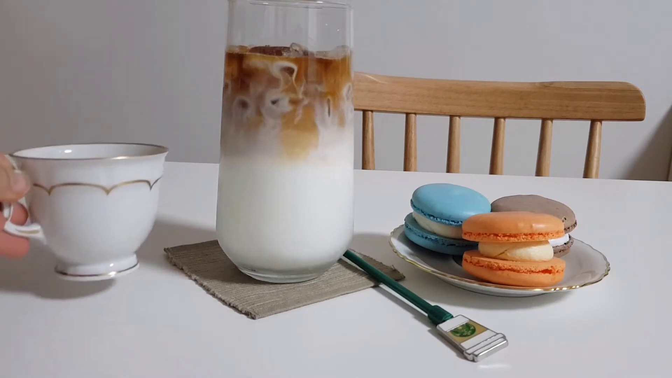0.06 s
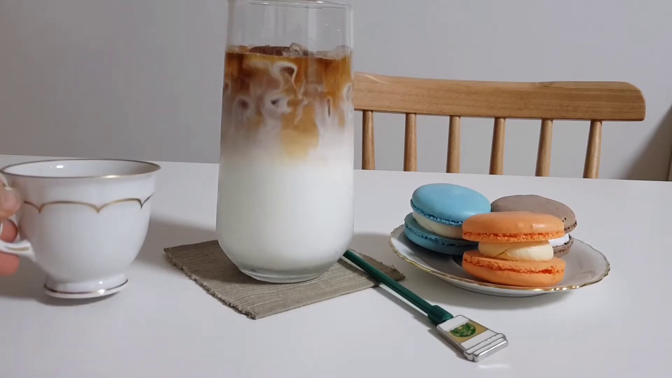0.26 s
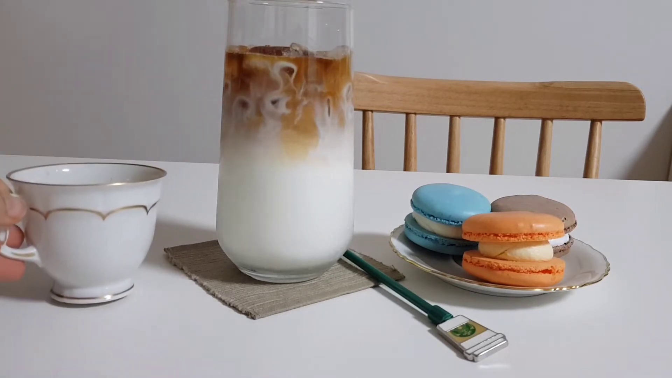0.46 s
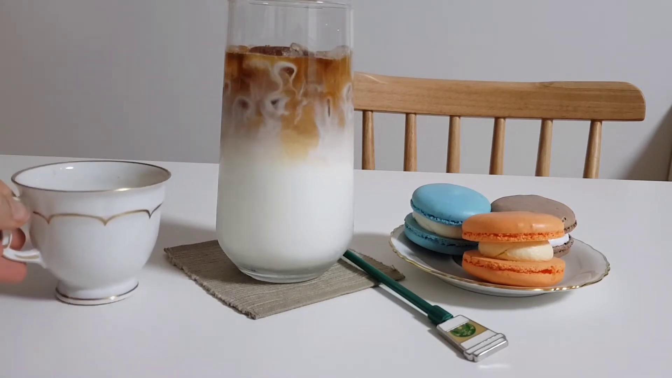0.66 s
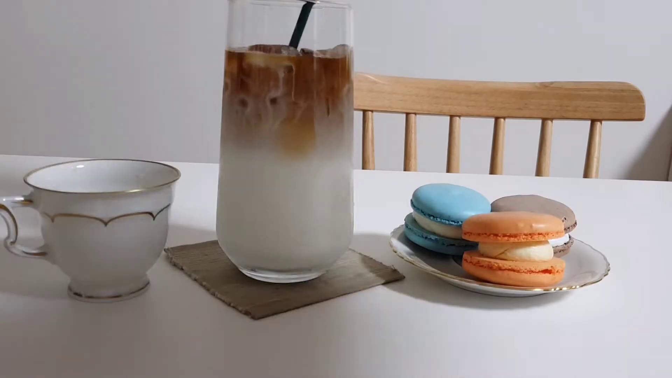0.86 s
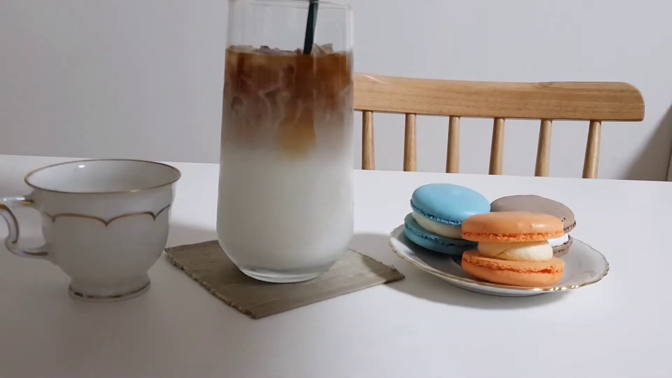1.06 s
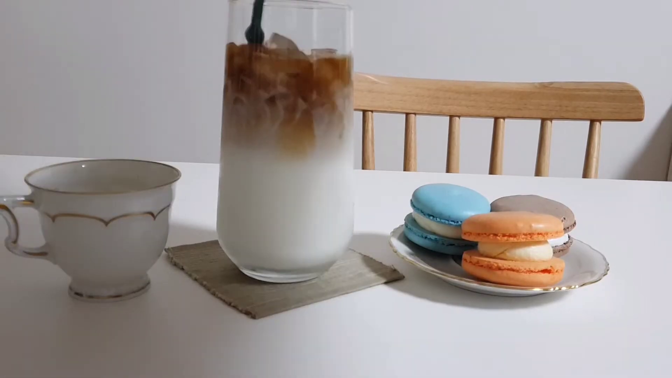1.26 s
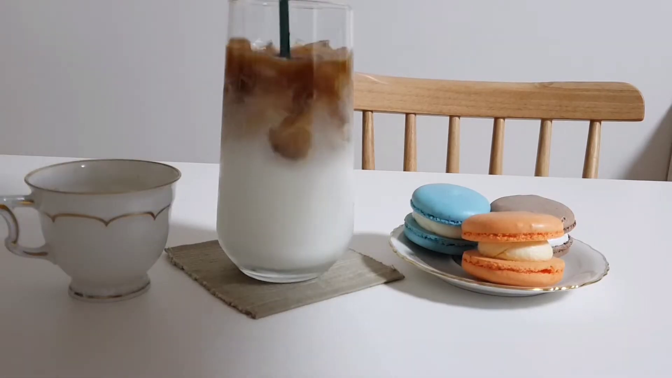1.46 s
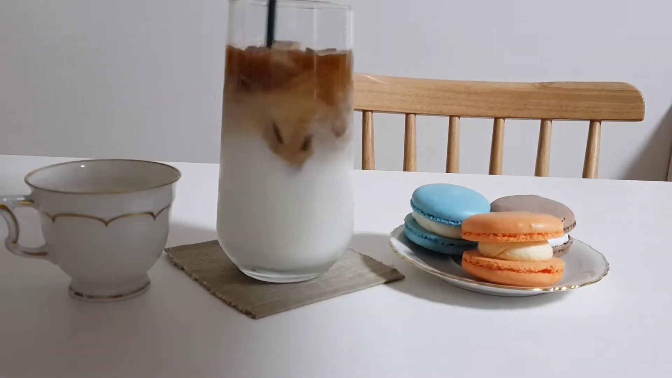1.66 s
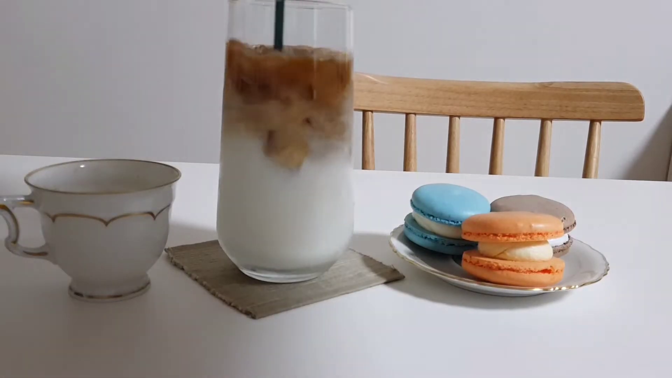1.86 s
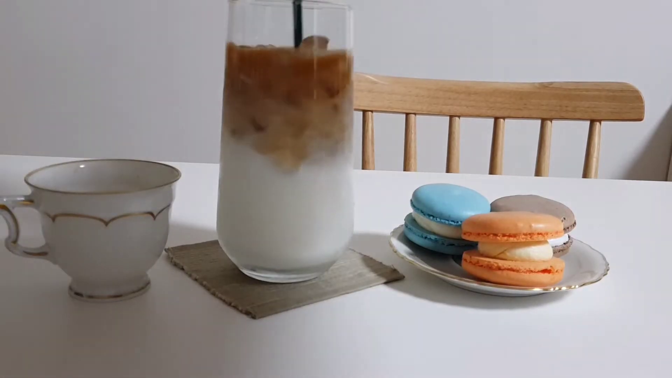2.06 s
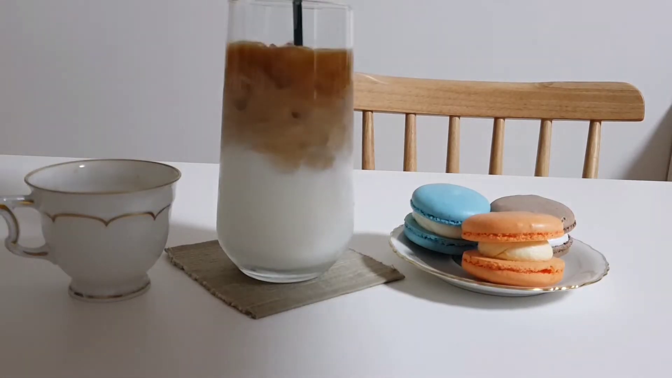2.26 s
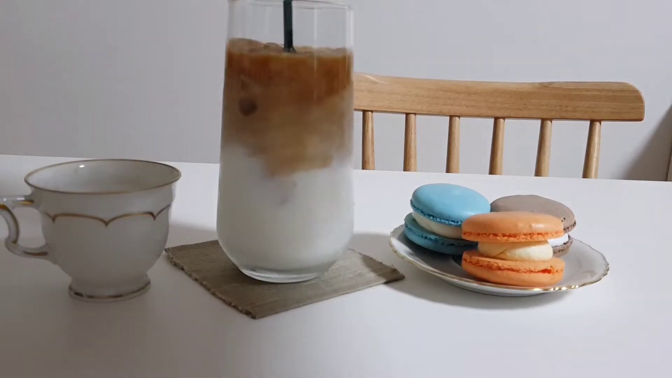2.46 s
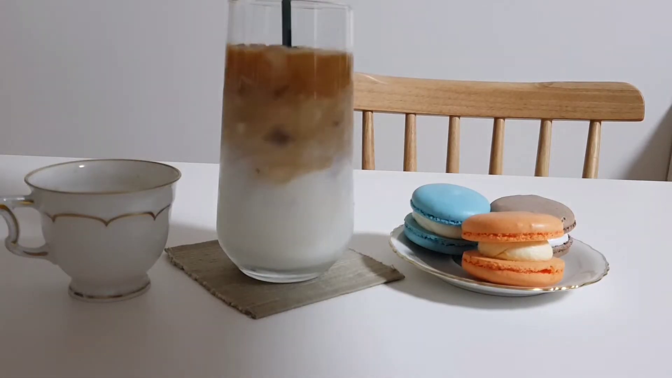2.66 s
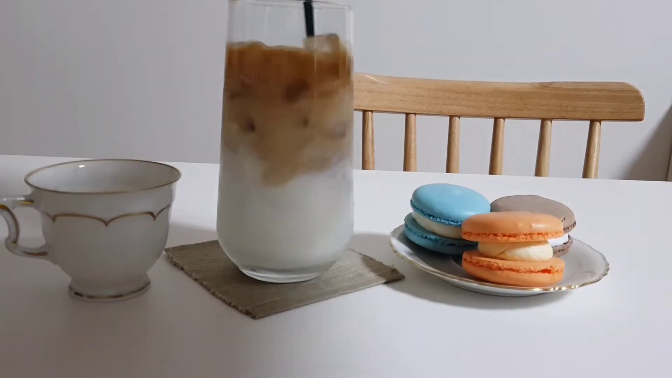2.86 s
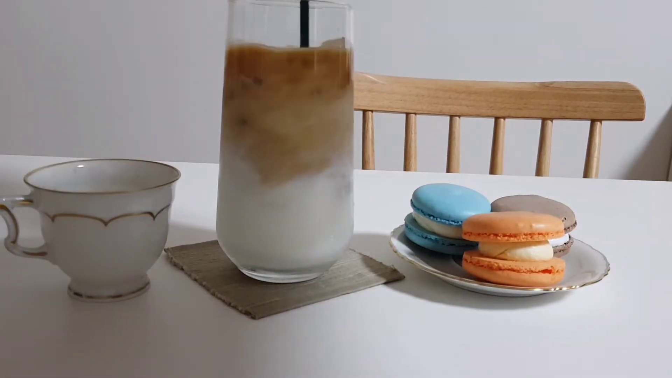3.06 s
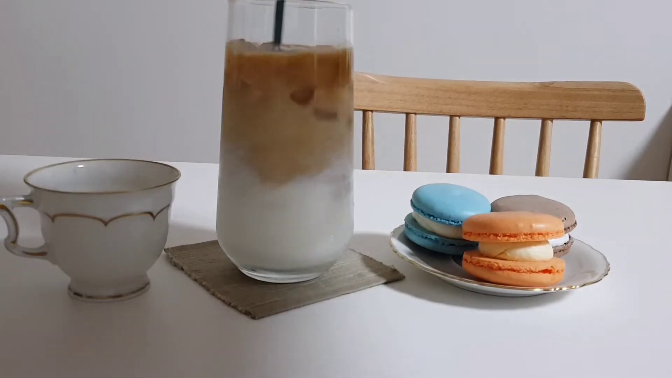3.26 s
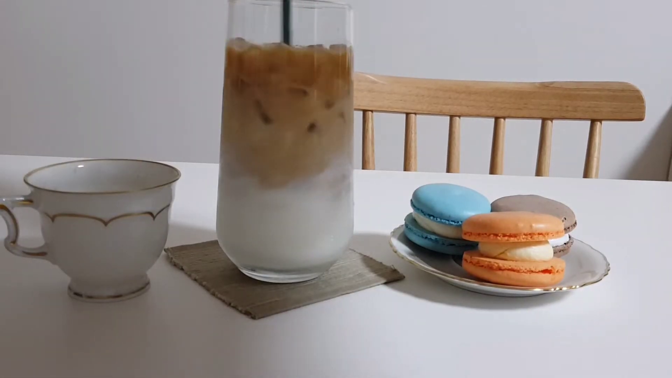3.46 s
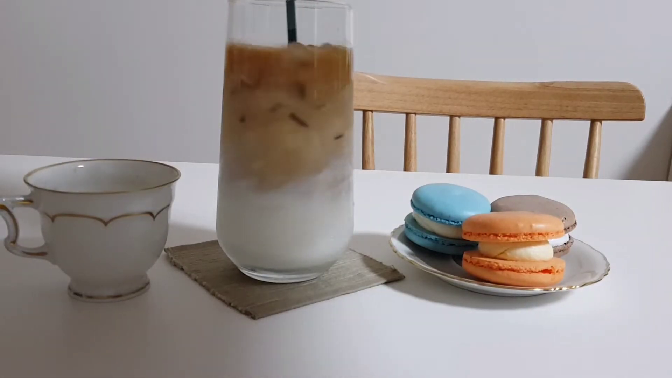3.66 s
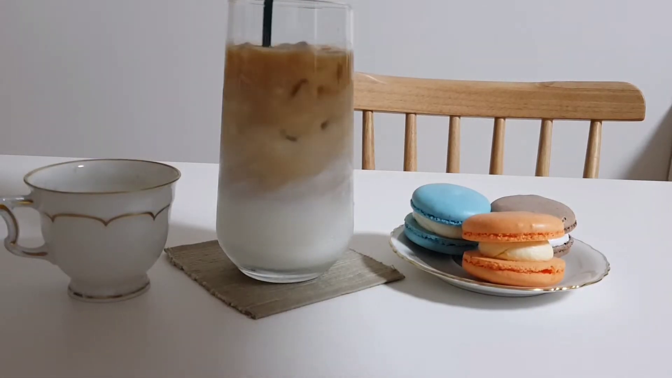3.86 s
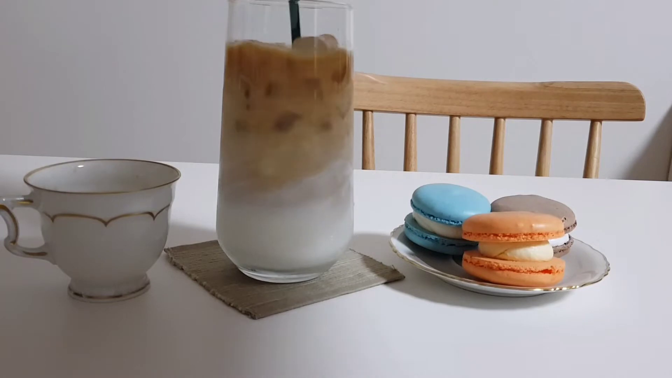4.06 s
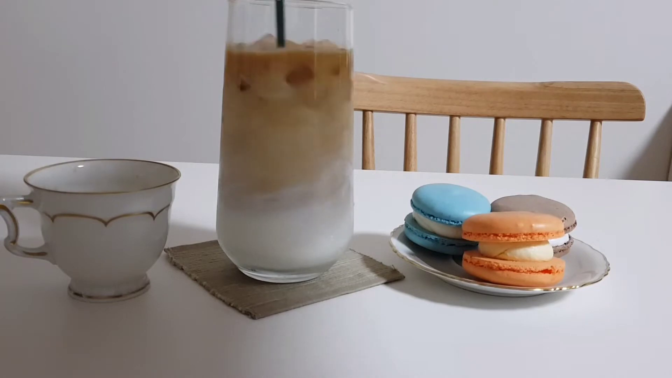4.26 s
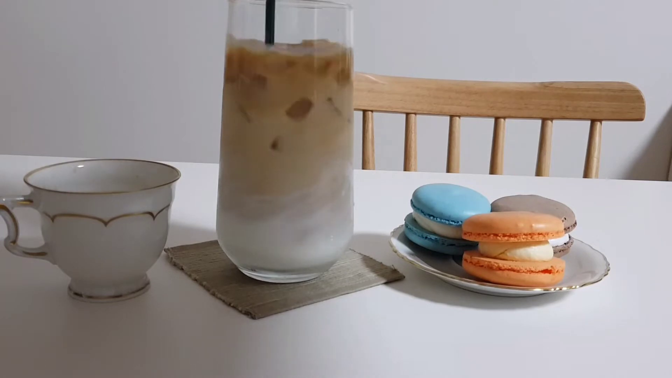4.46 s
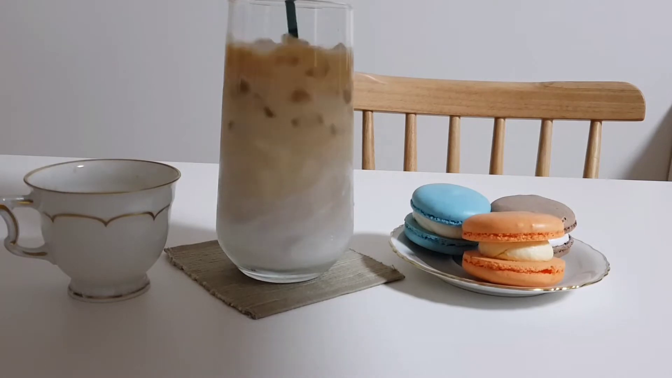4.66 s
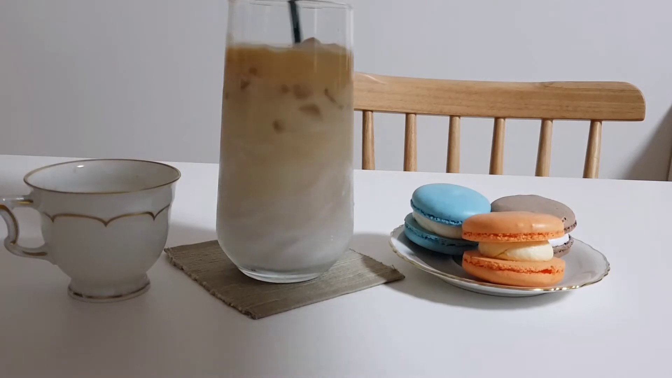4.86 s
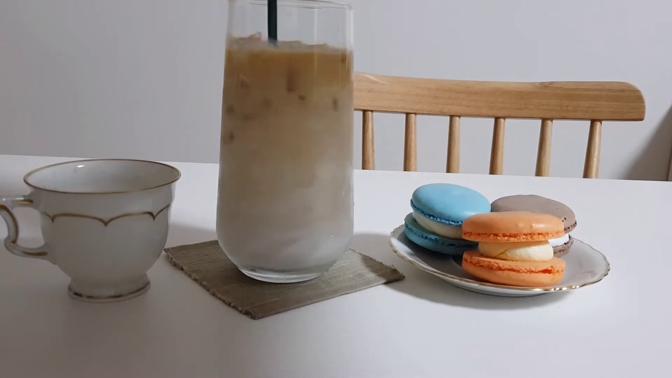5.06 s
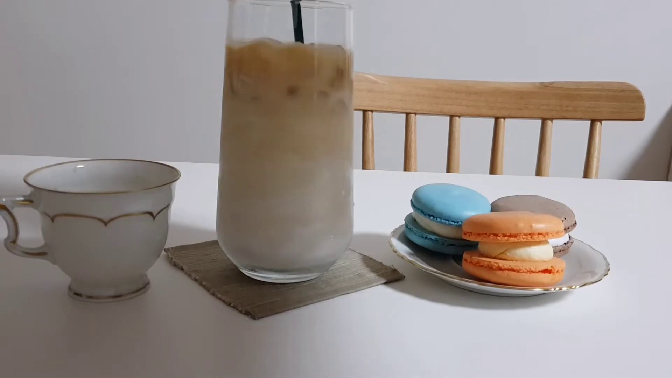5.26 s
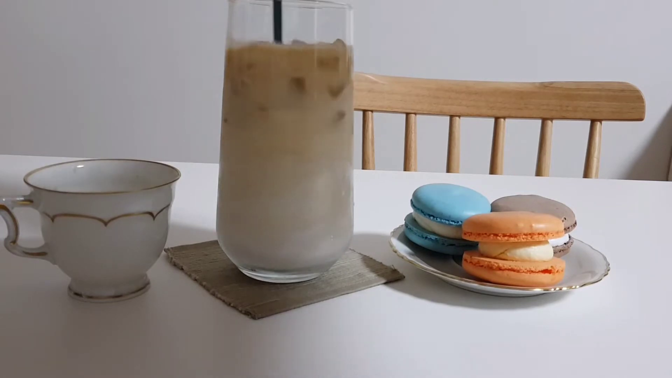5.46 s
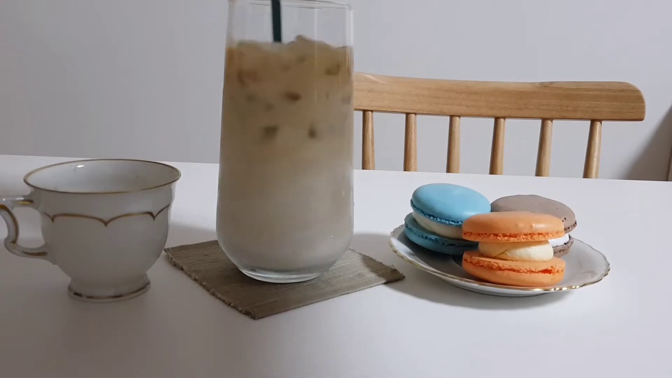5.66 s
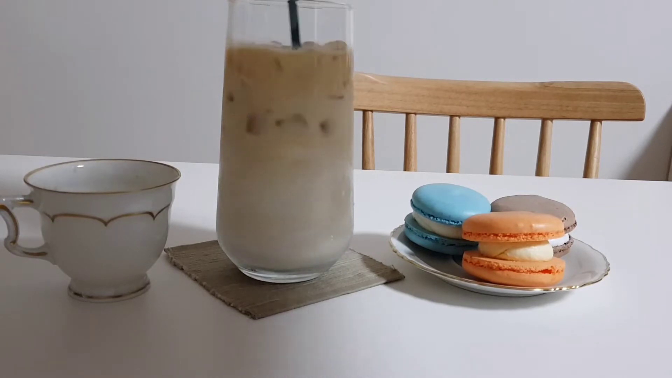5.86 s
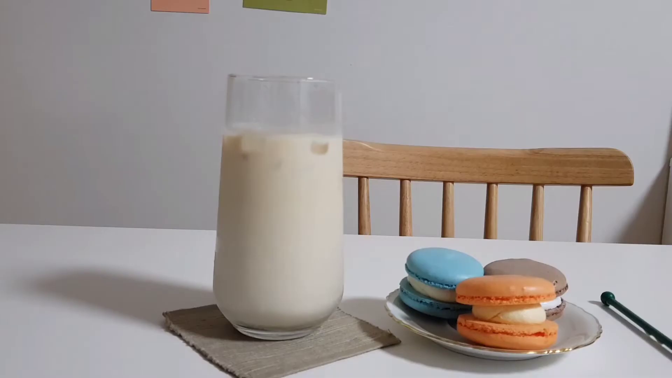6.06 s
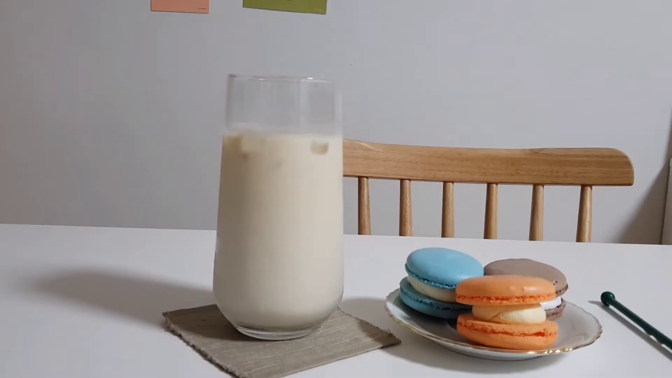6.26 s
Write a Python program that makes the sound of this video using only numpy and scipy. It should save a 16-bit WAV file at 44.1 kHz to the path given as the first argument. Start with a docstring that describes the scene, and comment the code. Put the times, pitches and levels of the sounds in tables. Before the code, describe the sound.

A porcelain cup knocks twice on a wooden table, then ice cubes crack and rattle busily in a tall glass being stirred, ending in quiet.

```python
"""A porcelain cup knocks twice on a wooden table, over faint hiss and hum; after a cut, ice cubes crack
and rattle in a tall glass of milky drink stirred with a plastic stick; a second cut leaves the quiet room.
The table is decaying sine modes and dense noise; the ice is noise bursts through resonances of the glass.
Dull thuds and low glass rings lie under the ice. A small room feeds two close microphones, the left nearer."""
import sys
import numpy as np
from scipy import signal
from scipy.fft import rfft, irfft
from scipy.io import wavfile
from scipy.ndimage import uniform_filter1d

SR = 44100
rng = np.random.default_rng(int(sys.argv[2]) if len(sys.argv) > 2 else 0)


def put_to_file(sound):
    """Save the sound as 16-bit audio at rate SR, in the file named by the first command-line argument."""
    columns = np.atleast_2d(sound).T  # one column per channel
    safe = np.clip(columns, -1, 1)
    whole_steps = np.round(safe * 32767)
    wavfile.write(sys.argv[1], SR, whole_steps.astype(np.int16))


N = 277830
SIZE = 4096  # samples, the unit of all ring lengths


def amp(db):
    """Decibels to amplitude."""
    return 10 ** (np.asarray(db) / 20)


def unit_rms(x):
    """Scale to an RMS of one."""
    return x / np.sqrt(np.mean(x ** 2) + 1e-20)


def unit_peak(x):
    """Scale each stereo sound to a peak of one."""
    return x / abs(x).max((-2, -1), keepdims=True)


def curve(points, hz):
    """Read a curve between its points along log frequency."""
    point_hz, value = np.transpose(points)
    return np.interp(np.log(hz + 1), np.log(point_hz + 1), value)


def add(mix, starts_s, sounds):
    """Lay each sound into the mix at its start, cut at the end of the mix."""
    for start_s, sound in zip(starts_s, sounds):
        part = mix[:, round(start_s * SR):][:, :sound.shape[1]]
        part += sound[:, :part.shape[1]]


def stereo_noise(count, length, likeness):
    """Left and right noises that share the given part of their waveform."""
    a, b = np.moveaxis(rng.standard_normal((count, 2, length)), 1, 0)
    right = likeness * a + np.sqrt(1 - likeness ** 2) * b
    return np.stack([a, right], 1)


# colour of the room and microphone hiss: (pitch_hz, relative_level_db per Hz)
HISS_COLOUR = [(12, -65.5), (20, -42), (40, -6), (63, -6), (92, -14), (144, -11), (180, -14.5),
               (207, -11.5), (354, -12), (696, -19.5), (8790, -40), (15400, -24.5), (16800, -66.5)]
# mains hum, RMS before the stereo lean: (pitch_hz, level_db)
HUM = [(59.2, -77.5), (118.4, -86.5), (177.6, -86)]


def air():
    """Steady hiss, most alike in both microphones in the bass, and a steady mains hum of three sines."""
    hz, t = np.fft.rfftfreq(N, 1 / SR), np.arange(N) / SR
    a, b = rfft(rng.standard_normal((2, N)))
    likeness = 0.7 / (1 + hz / 900)
    right = likeness * a + np.sqrt(1 - likeness ** 2) * b
    hiss = irfft(np.array([a, right]) * amp(curve(HISS_COLOUR, hz)), N)
    hum = np.zeros(N)
    for pitch_hz, level_db in HUM:
        hum += amp(level_db) * np.sqrt(2) * np.sin(2 * np.pi * (pitch_hz * t + rng.random()))
    return (amp(-72.5) * unit_rms(hiss) + hum) * amp([[1.2], [-1.2]])


# decay of the small room: (pitch_hz, t60_s)
ROOM_DECAY = [(700, 0.49), (2000, 0.17), (5000, 0.12), (12000, 0.077)]


def room(x, wet_db, right_delay):
    """Sound reaches the left microphone louder and `right_delay` samples first; the tail differs per side."""
    length = SR // 2
    taps = np.zeros((2, length))
    # one echo of random sign in every 20 samples
    at = np.arange(100, length - 20, 20) + rng.integers(0, 20, (2, (length - 101) // 20))
    np.put_along_axis(taps, at, rng.choice([-1., 1.], at.shape), 1)
    hz, t, z = signal.stft(taps, SR, nperseg=256)
    z *= amp(-60 * t / curve(ROOM_DECAY, hz)[:, None])
    response = signal.istft(z, SR, nperseg=256)[1][:, :length]
    response *= amp(wet_db) / np.linalg.norm(response[0])
    response[0, 0], response[1, right_delay] = 1, 1  # direct sound
    return signal.fftconvolve(x, response, axes=1)[:, :N] * amp([[2.2], [-2.2]])


# strongest modes of table top and cup: (pitch_hz, relative_level_db, t60_s)
TABLE_MODES = [(256, -9, .2), (277, -10, .25), (431, -14, .16), (539, -4, .15), (574, -9, .15),
               (683, -10, .2), (885, -2, .13), (912, -4, .13), (972, -10, .18), (1028, -12, .2),
               (1462, -8, .18), (1700, -6, .22)]
# the many dense modes between them: (pitch_hz, relative_level_db per Hz)
WOOD_COLOUR = [(60, -34.5), (130, -20), (255, -17), (550, -13), (890, -1.5), (1730, -2.5), (2490, -26),
               (2950, -16.5), (3700, -35), (4400, -31.5), (8000, -46), (14000, -70)]


def table_blows(rows, ring_db, t60, turns):
    """A blow rings strong modes and a dense mass of weak ones, whose treble dies first; dull ones rise slowly.

    Here t60 (s) is the dense decay near 700 Hz; the rise lasts about `turns` cycles of the treble limit."""
    out, t = np.zeros((2, N)), np.arange(4 * SIZE) / SR
    mode_hz, mode_db, mode_t60 = np.transpose(TABLE_MODES)[:, :, None]
    for start_s, level_db, dull_hz in rows:
        hz, frame_s, z = signal.stft(stereo_noise(1, len(t), 0.48)[0], SR, nperseg=256)
        z *= amp(-60 * frame_s / (t60 * (1000 / (hz[:, None] + 300)) ** 0.39))
        dense = rfft(signal.istft(z, SR, nperseg=256)[1][:, :len(t)])

        hz = np.fft.rfftfreq(len(t), 1 / SR)
        dense *= amp(curve(WOOD_COLOUR, hz)) / (1 + (hz / dull_hz) ** 4)
        dense = unit_peak(irfft(dense))
        dense *= np.minimum((t[-1] - t) * 20, 1)  # fades out before it is cut

        modes = amp(mode_db - 60 * t / mode_t60) * np.sin(2 * np.pi * mode_hz * t)
        modes *= rng.choice([-1, 1], (len(TABLE_MODES), 1)) / (1 + (mode_hz / dull_hz) ** 4)
        rise = (1 - np.exp(-t * dull_hz / turns)) ** 2
        blow = (dense + amp(ring_db) * modes.sum(0)) * rise
        add(out, [start_s], [amp(level_db) * unit_peak(blow)])
    return out


# cup foot on the table, peak before the room: (start_s, level_db, treble_limit_hz)
KNOCKS = [(0.343, -16, 11000), (0.364, -20.5, 8100), (0.658, -52, 1020), (0.684, -46, 1090),
          (0.708, -33, 1230), (0.717, -19.5, 2000)]


def cup_knocks():
    """The foot of the cup strikes the table; the harder contacts reach further into the treble."""
    return table_blows(KNOCKS, ring_db=-6.0, t60=0.28, turns=2.8)


# stick pushing the ice down, peak before the room: (start_s, level_db)
THUDS = [(0.833, -51.5), (1.157, -43.5), (1.34, -48), (1.572, -57), (1.7, -46.5)]


def stick_thuds():
    """The pushes reach the table through the glass, which leaves little treble."""
    treble_limit_hz = 356
    rows = [(*row, treble_limit_hz) for row in THUDS]
    return table_blows(rows, ring_db=-4.5, t60=0.168, turns=.6)


# low modes of the filled glass, level under the rattle: (pitch_hz, width_hz, level_db)
LOW_MODES = [(827, 18, -23), (561.4, 24, -32)]
# heavier pushes on the wall, peaks before stereo lean and room: (start_s, upper_mode_level_db, lower_mode_level_db)
RINGS = [(1.247, -71.5, -60), (1.33, -62, -62), (1.581, -46, -82), (1.721, -52, -66), (1.798, -46.5, -70.5),
         (1.85, -55, -79), (1.952, -53.5, -69), (2.028, -50.5, -64.5), (2.1, -56, -78), (2.187, -58, -95),
         (2.3, -51, -74.5), (2.452, -53.5, -76), (2.569, -53.5, -79), (2.695, -55.5, -87),
         (2.778, -55, -82), (2.865, -60, -69), (3.263, -65, -77), (3.386, -59, -66.5), (3.543, -74, -63),
         (3.712, -56.5, -61), (3.787, -67, -65), (4.05, -57, -75.5), (4.173, -55, -78),
         (4.342, -44.5, -81.5), (4.464, -51.5, -82), (4.599, -59, -78), (5.127, -64, -65),
         (5.248, -85, -60), (5.322, -57, -70), (5.432, -52, -71), (5.529, -59, -95), (5.584, -58, -88)]


def low_rings():
    """Each push swells the low modes over a few milliseconds, slightly detuned by the moving drink."""
    t60_s, rise_s, detune_share = .26, .007, .003
    out, t = np.zeros((2, N)), np.arange(3 * SIZE) / SR
    shape = amp(-60 * t / t60_s) * (1 - np.exp(-t / rise_s))
    shape /= shape.max()
    chance = rng.standard_normal((len(RINGS), 2))
    for (start_s, *levels_db), (detune, phase) in zip(RINGS, chance):
        ring = np.zeros(len(t))
        for level_db, mode in zip(levels_db, LOW_MODES):
            pitch_hz = mode[0] * (1 + detune_share * detune)
            ring += amp(level_db) * np.sin(2 * np.pi * pitch_hz * t + np.pi * phase)
        add(out, [start_s - rise_s], [ring * shape * amp([[1], [-1]])])
    return out


# modes of the glass wall: (pitch_hz, width_hz, relative_level_db)
WALL_MODES = [(1940, 51, 4), (2150, 98, 0), (2600, 970, -12), (3744, 44, 12.5), (3990, 148, 9),
              (5700, 206, 9), (6240, 200, 5), (7110, 120, 10.5), (9340, 250, -3), (11300, 240, 0),
              (12230, 277, 1)]
# colour of the ice contact: (pitch_hz, relative_level_db per Hz)
CRACK_COLOUR = [(300, -5), (1200, -88), (2100, -1), (3000, -7.5), (4500, 4.5), (7000, 6), (10000, 2.5),
                (14000, 1.5), (15500, -40), (16800, -52.5)]


def clinks(bright_hz, wall_db, crack_s, spread_db):
    """A burst of contact noise is heard directly and through the glass; the spot struck sets the mode shares."""
    hz, t = np.fft.rfftfreq(SIZE // 2, 1 / SR), np.arange(SIZE // 2) / SR
    count = len(bright_hz)
    lasting_s = crack_s * rng.uniform(0.66, 2.1, (count, 1, 1))  # glancing contacts last longer
    burst = rfft(stereo_noise(count, SIZE // 2, 0.3) * t ** 2 * np.exp(-t / lasting_s))

    chance = rng.standard_normal((count, len(WALL_MODES), 4, 1))
    body = amp(curve(CRACK_COLOUR, hz)) * np.ones((count, 2, 1), complex)
    for k, (pitch_hz, width_hz, level_db) in enumerate(WALL_MODES):
        centre_hz = pitch_hz * (1 + 0.028 * chance[:, k, :1])  # moving ice and drink detune the wall
        share_db = spread_db * np.clip(chance[:, k, 1:2], -2, 1.5)
        share_db = share_db + 3 * chance[:, k, 2:]  # each side faces another part of the wall
        body += amp(level_db + wall_db + share_db) / (1 + 2j * (hz - centre_hz) / width_hz)

    # hard, brief contacts are brighter; 6500 Hz leaves the balance as it is
    slope = 3.27 * np.log(bright_hz[:, None, None] / 6500)
    tilt = (np.maximum(hz, 2500) / 6500) ** slope
    little_bass = (1j * hz / (1500 + 1j * hz)) ** 3  # a small object radiates little bass
    return unit_peak(irfft(burst * body * tilt * little_bass))


# distinct hits of ice against glass, peak before the room: (start_s, level_db, brightness_hz)
CLINKS = [(0.8406, -31.5, 6030), (0.8845, -30, 8200), (0.996, -42, 5160), (1.101, -36, 5560),
          (1.127, -30, 5400), (1.158, -21, 5100), (1.1625, -32, 5630), (1.1896, -20.5, 5650),
          (1.2431, -27, 4000), (1.3279, -21, 5300), (1.368, -23, 4900), (1.4401, -20, 7100),
          (1.474, -30, 5140), (1.4921, -21, 5300), (1.5255, -24.5, 4750), (1.5476, -19, 7800),
          (1.581, -20, 5830), (1.6905, -19, 5600), (1.7251, -14, 5570), (1.7814, -15.5, 6900),
          (1.8111, -18, 7740), (1.8205, -21.5, 7700), (1.8596, -29, 5600), (2.0066, -20, 7600),
          (2.0475, -22, 10200), (2.063, -22, 10100), (2.1791, -27, 5870), (2.195, -31.5, 5940),
          (2.267, -37, 6500), (2.2797, -18.5, 7900), (2.3064, -16.5, 7560), (2.3536, -24, 6460),
          (2.415, -25.5, 9900), (2.4498, -23, 6140), (2.555, -25, 7300), (2.5747, -28.5, 6800),
          (2.6063, -23, 9800), (2.69, -25.5, 9500), (2.697, -29, 5730), (2.7794, -21.5, 9000),
          (2.804, -19, 7700), (2.865, -27.5, 4770), (2.946, -20.5, 7700), (2.9485, -23.5, 10400),
          (3.0245, -25, 6700), (3.0562, -38, 7000), (3.0953, -26, 10000), (3.111, -23.5, 10100),
          (3.1225, -29, 7400), (3.2544, -22, 6370), (3.2758, -25.5, 8500), (3.299, -29.5, 8500),
          (3.369, -31.5, 7050), (3.3792, -20.5, 6460), (3.422, -24, 6400), (3.4864, -27, 8500),
          (3.503, -26, 6500), (3.5426, -18.5, 6700), (3.59, -37, 8000), (3.6593, -21, 6250),
          (3.7003, -22, 6540), (3.7214, -28, 7500), (3.7687, -25, 6900), (3.78, -32, 8000),
          (3.7936, -21, 8100), (3.8618, -29, 8800), (3.974, -23, 9900), (4.002, -20, 8050),
          (4.0467, -15, 8400), (4.073, -21.5, 6400), (4.138, -23.5, 7900), (4.175, -18, 6400),
          (4.2652, -24, 6100), (4.308, -23.5, 7960), (4.3207, -20, 7750), (4.3315, -18, 5100),
          (4.339, -16.5, 5450), (4.39, -19.5, 6600), (4.4551, -21, 7960), (4.4865, -24.5, 8650),
          (4.5664, -22.5, 6800), (4.5977, -15, 9400), (4.6334, -23, 8340), (4.7308, -24, 11100),
          (4.8861, -26.5, 7040), (4.906, -23.5, 5960), (4.947, -20.5, 7160), (5.0528, -25.5, 7340),
          (5.073, -19.5, 6150), (5.084, -24, 5750), (5.1295, -23, 6350), (5.216, -18.5, 9400),
          (5.2239, -26.5, 10800), (5.32, -35.5, 7040), (5.3388, -30, 7900), (5.3967, -25, 6000),
          (5.4421, -20, 6140), (5.5259, -22.5, 9000), (5.5449, -28.5, 6200), (5.5708, -22.5, 7000),
          (5.5822, -23.5, 9500), (5.6461, -29, 6700), (5.715, -26, 7500), (5.766, -29.5, 7140),
          (5.8171, -26.5, 6500), (5.864, -34, 9000), (5.8806, -19, 6900), (5.8963, -21, 7300)]


def rebounds():
    """Each cube bounces back twice at uneven gaps, as a rule weaker each time and duller than its clink."""
    gap_s, drop_db, drop_spread_db = .016, -12.5, 4
    start_s, level_db, bright_hz = np.transpose(CLINKS)[:, :, None]
    chance = rng.standard_normal((len(CLINKS), 3, 2))
    later_s = start_s + np.cumsum(gap_s * np.exp(.4 * chance[:, 0]), axis=1)
    weaker_db = level_db + np.cumsum(drop_db + drop_spread_db * chance[:, 1], axis=1)
    duller_hz = 0.77 * bright_hz * np.exp(0.36 * chance[:, 2])
    return np.transpose([later_s.ravel(), weaker_db.ravel(), duller_hz.ravel()])


# rattle of small cubes as the drink is stirred, before the room: (start_s, level_db)
JOSTLE = [(0.73, -70), (0.8, -68), (0.829, -55), (0.96, -52), (1.23, -68), (1.34, -50.5), (1.64, -43),
          (2.09, -45), (2.21, -49.5), (2.65, -53), (3.56, -47.5), (4.27, -48), (4.53, -46.5), (4.85, -62.5),
          (5.09, -46.5), (5.56, -51.5), (5.8, -67), (5.979, -71)]


def ice():
    """Distinct clinks stand out of a dense rattle of small ones, which also nudges the low glass modes."""
    out, rattle = np.zeros((2, 2, N))
    start_s, level_db, bright_hz = np.vstack([CLINKS, rebounds()]).T
    hits = clinks(bright_hz, wall_db=5.5, crack_s=0.00031, spread_db=6)
    add(out, start_s - 44 / SR, amp(level_db)[:, None, None] * hits)  # 1 ms early, as a burst swells

    # small hits of uneven strength, 420 a second on average
    small = clinks(rng.uniform(4430, 7320, size=160), wall_db=0.5, crack_s=0.00054, spread_db=8.0)
    strength = amp(3.73 * np.minimum(rng.exponential(1, N), 4)) * (rng.random(N) < 420 / SR)
    kind = rng.integers(0, len(small), N)
    at = np.flatnonzero(strength)
    add(rattle, at / SR, strength[at, None, None] * small[kind[at]])
    rattle = unit_rms(rattle)

    # every clink sets the neighbouring cubes knocking for a moment
    shaken_power, t = np.zeros(N), np.arange(2 * SIZE) / SR
    np.add.at(shaken_power, (start_s * SR).astype(int), amp(2 * level_db))
    flurry = np.exp(-t / 0.016) * (1 - np.exp(-t / 0.003))
    shaken_power = abs(signal.fftconvolve(shaken_power, flurry)[:N])
    jostle_s, jostle_db = np.transpose(JOSTLE)
    steady = amp(np.interp(np.arange(N) / SR, jostle_s, jostle_db, left=-200))
    busy = np.sqrt(steady ** 2 + amp(-35.5) * shaken_power)

    for pitch_hz, width_hz, mode_db in LOW_MODES:
        pole = np.exp((2j * np.pi * pitch_hz - np.pi * width_hz) / SR)
        nudges = uniform_filter1d(strength * rng.choice([-1, 1], N), size=30)
        even, stirred = signal.lfilter([1], [1, -pole], [nudges, nudges * busy]).real
        out += amp(mode_db) * stirred / even.std()
    return out + rattle * busy


# the two cuts: (cup_end_s, stirring_end_s)
CUTS = (.7285, 5.983)


def scene():
    """The cup up to the first cut, the stirring up to the second, the air throughout."""
    t = np.arange(N) / SR
    cup = room(cup_knocks(), wet_db=-18, right_delay=10)
    stirring = room(ice() + stick_thuds(), wet_db=-6.5, right_delay=5)
    stirring += room(low_rings(), wet_db=-19.5, right_delay=5)
    cup_gate = np.clip((CUTS[0] - t) / .0004 + .5, 0, 1)  # 0.4 ms fade
    stirring_gate = np.clip((CUTS[1] - t) / .004, 0, 1)  # 4 ms fade
    return cup * cup_gate + stirring * stirring_gate + air()


def record(dry):
    """A steep low-pass at 16.3 kHz limits the band."""
    low_pass = signal.firwin(511, 16300, window=("kaiser", 9), fs=SR)
    return signal.oaconvolve(dry, low_pass[None], "same")


dry = scene()
out = record(dry)
put_to_file(out)
```